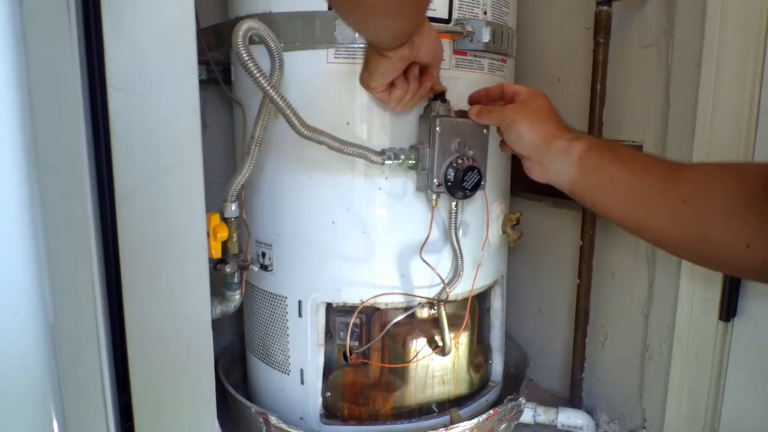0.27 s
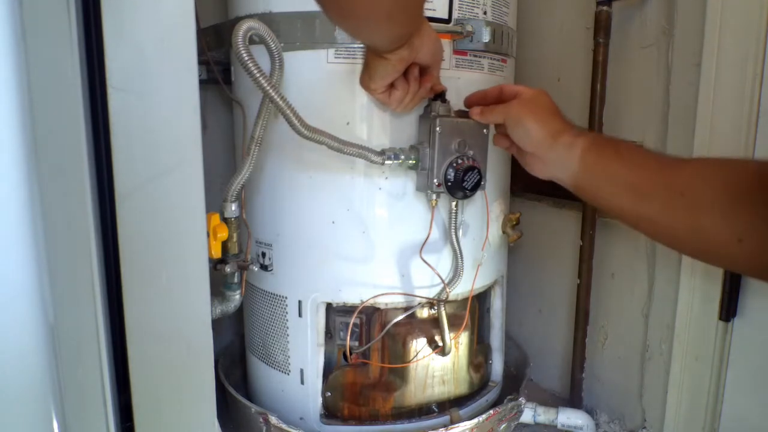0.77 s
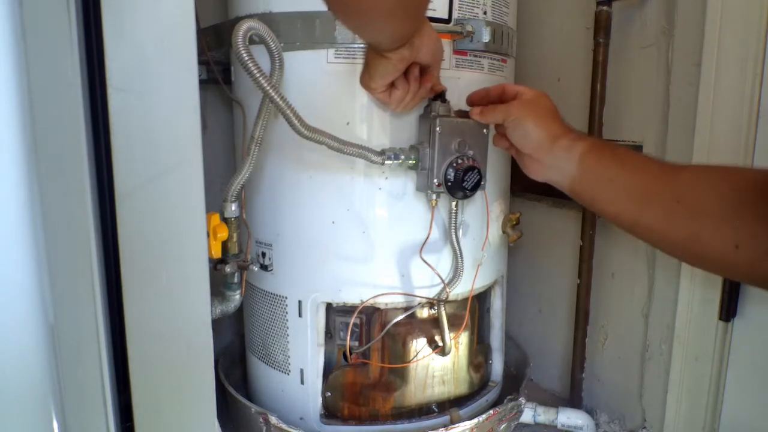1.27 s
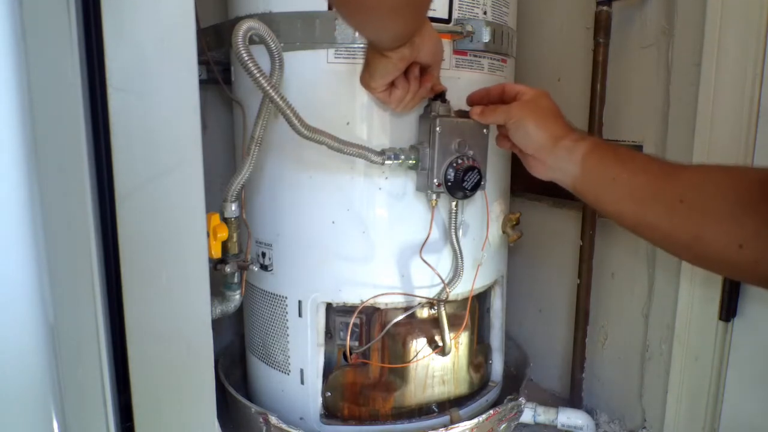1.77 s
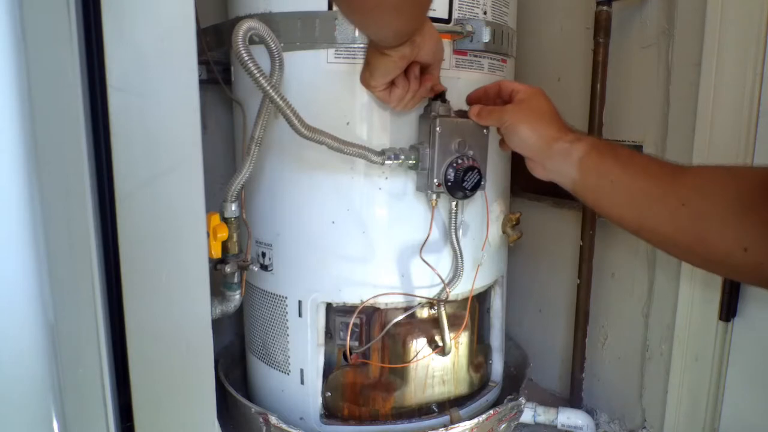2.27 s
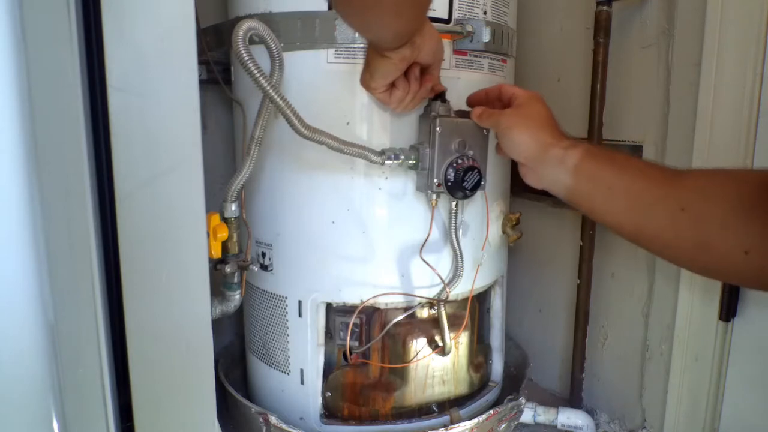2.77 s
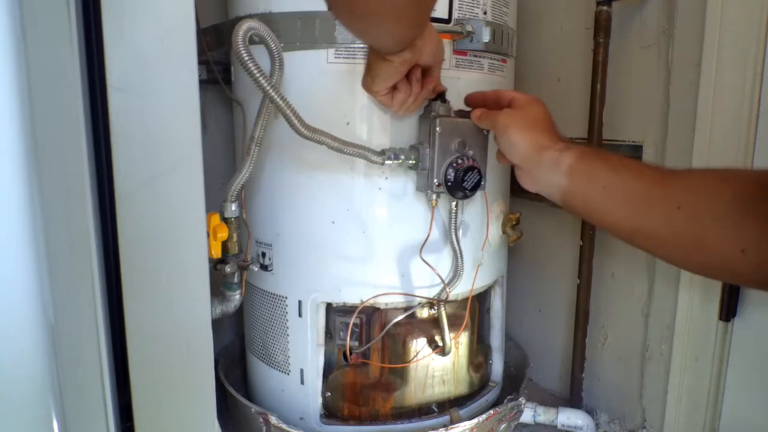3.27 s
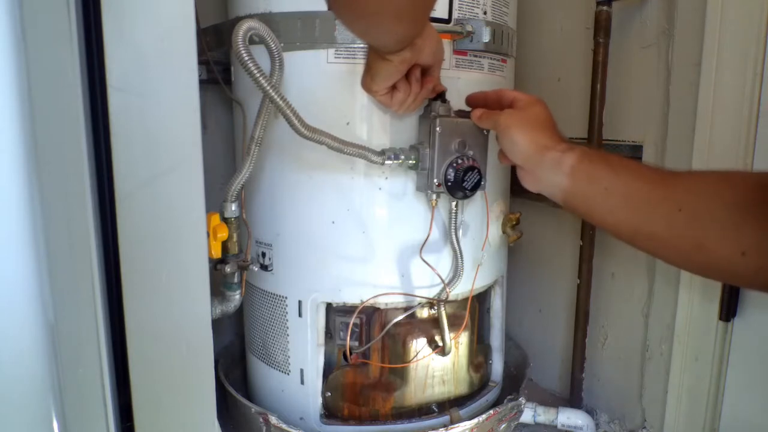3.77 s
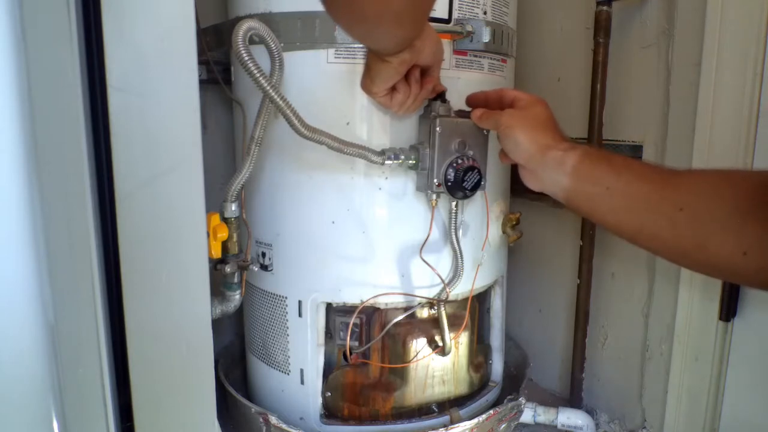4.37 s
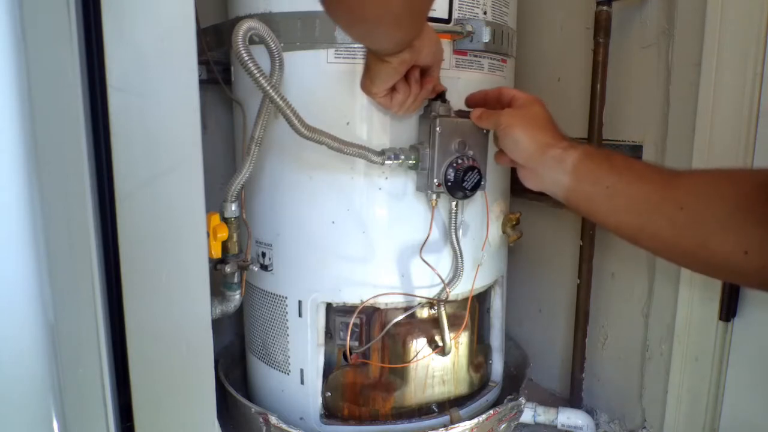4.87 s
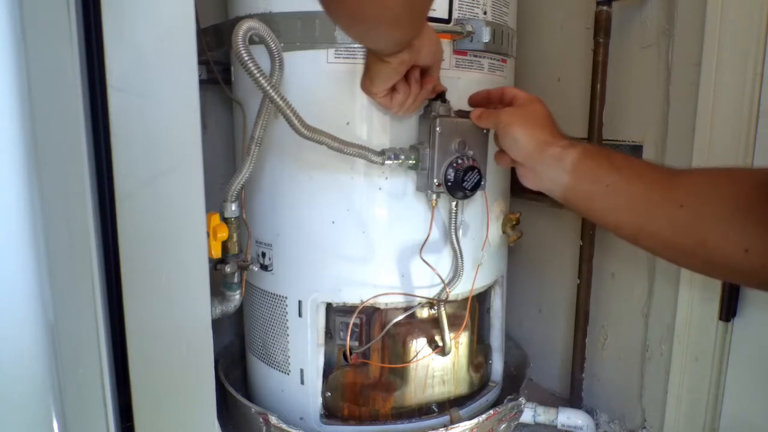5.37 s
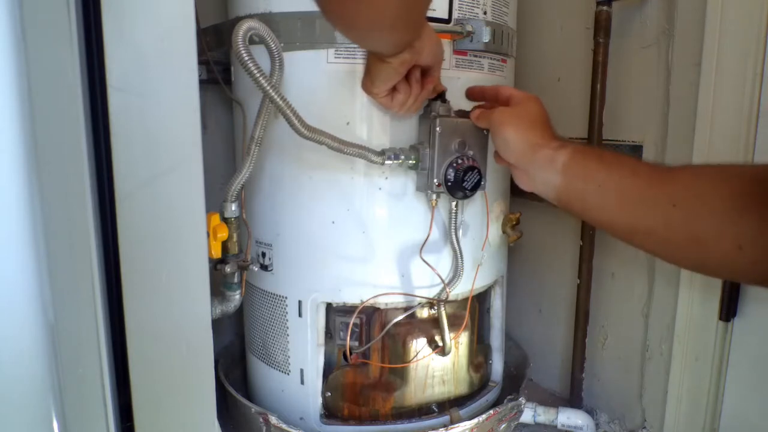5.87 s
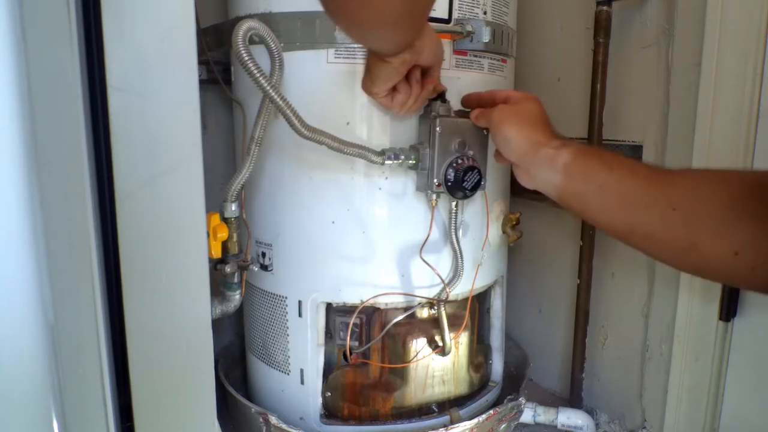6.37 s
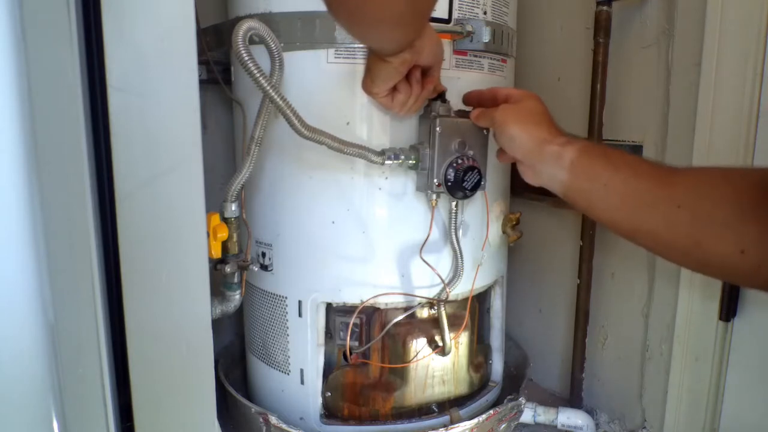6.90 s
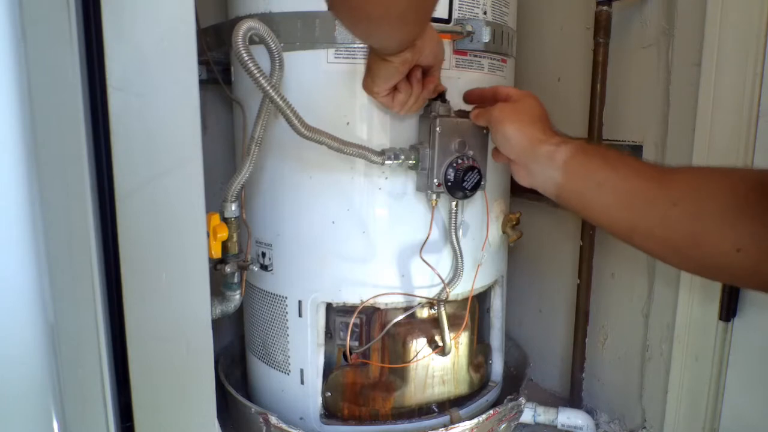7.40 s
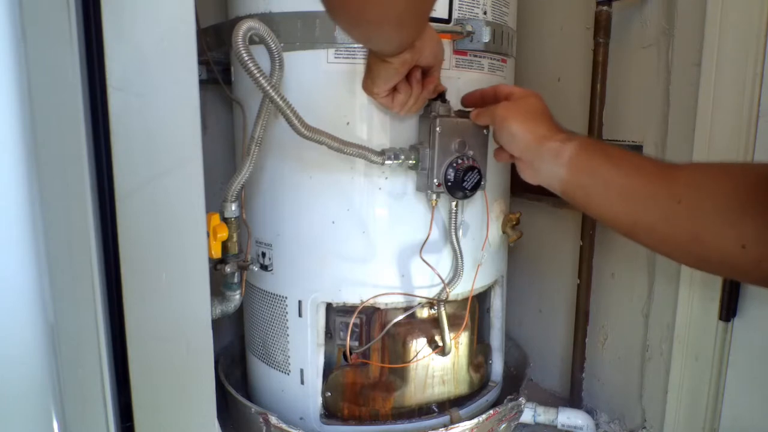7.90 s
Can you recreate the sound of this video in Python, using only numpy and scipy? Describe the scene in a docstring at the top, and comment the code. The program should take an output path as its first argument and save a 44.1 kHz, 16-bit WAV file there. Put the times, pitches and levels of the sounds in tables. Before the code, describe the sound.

Four sharp, ringing igniter clicks on a water heater alternate unevenly with softer clicks of the button springing back in a quiet closet.

```python
"""A quiet mono hum fills a narrow closet as the spark button of a water heater's gas valve springs back.
A thumb then pushes it four times: a spring hammer snaps onto the crystal and rings the sheet metal,
and letting go gives a softer click. After each blow the sound swells back and holds a moment before
it dies into the hum. Between the clicks and after the last, the thumb ticks faintly on the button."""
import sys
import numpy as np
from scipy import signal
from scipy.fft import rfft, irfft
from scipy.io import wavfile
from scipy.ndimage import uniform_filter1d

SR = 44100
rng = np.random.default_rng(int(sys.argv[2]) if len(sys.argv) > 2 else 0)


def master(y):
    """Save y as 16-bit WAV."""
    cut = np.clip(np.atleast_2d(y).T, -1, 1)
    pcm = np.round(cut * 32767)  # scale
    wavfile.write(sys.argv[1], SR, pcm.astype(np.int16))


N = 358974


def amp(db):
    return 10 ** (np.asarray(db) / 20)


def unit_rms(x):
    return x / np.sqrt(np.mean(x ** 2) + 1e-20)


def curve(hz, points):
    """Read (frequency, value) breakpoints along a log frequency axis."""
    freqs, values = np.transpose(points)
    return np.interp(np.log(hz + 1), np.log(freqs + 1), values)


def add(mix, start_s, sound):
    """Lay a sound into the mix, trimming any overhang."""
    at = round(start_s * SR)
    sound = sound[max(-at, 0):]
    part = mix[max(at, 0):][:len(sound)]
    part += sound[:len(part)]


# EQ of the room tone: f/Hz, relative level/dB
HUM_EQ = [(15, -20.5), (25, -2), (113, -3), (144, -2), (235, -6), (513, -7.5), (709, -1.5), (790, -3.5),
          (955, -3), (1030, -9), (1510, -13.5), (5660, -18.5), (13800, -18.5), (15800, -19.5)]

def hum(level_db=-62):
    """Room tone: steady noise that swells a little in patches, most in the bass."""
    frames, hz = N // 256 + 5, np.fft.rfftfreq(1024, 1 / SR)
    real, imag, patches = rng.standard_normal((frames, 513, 3)).T
    patches = uniform_filter1d(patches, size=10, axis=0)  # smooth across pitch
    patches = unit_rms(uniform_filter1d(patches, size=30, axis=1))  # and over time
    depth_db = curve(hz, [(600, 1.5), (2000, .5)])[:, None]
    spectrum = (real + 1j * imag) * amp(curve(hz, HUM_EQ)[:, None] + depth_db * patches)
    noise = signal.istft(spectrum, nperseg=1024, noverlap=768)[1][:N]
    return amp(level_db) * unit_rms(noise)


# Release cues, the first just before zero: t/s, echo gain/dB, ring gain/dB, swell length/s
RELEASES = [(-.03, -37.5, -46, 0.022), (2.034, -37.5, -44, 0.06), (4.723, -36.5, -43.5, 0.055),
            (7.02, -37.5, -43, 0.064), (7.942, -36.5, -39.5, 0.053)]
# Base EQ of a release: f/Hz, relative level/dB
RELEASE_EQ = [(53, -46), (90, -19), (151, -1), (344, -16), (590, -8.5), (687, -4), (834, 1), (1150, -6.5),
              (1230, -5), (1980, -5.5), (3260, -1.5), (5720, -12), (7570, -12), (15800, -53.5)]

def button_releases(mix, panel_db):
    """The button springs back: a soft click that lightly rings the metal."""
    for start_s, echo_db, ring_db, swell_s in RELEASES:
        noise = click_noise(RELEASE_EQ, panel_db, tilt_db_per_octave=0.5)
        echoes = closet_echoes(noise, swell_s, wait_s=0.0033, crack_db=10.5, crack_s=0.0029)
        ring = metal_ring(swell_s, bloom_s=0.034, damped_s=0.14)
        add(mix, start_s, amp(echo_db) * echoes + amp(ring_db) * ring)


def panel_response():
    """Countless small panel modes make a fine, jagged EQ, roughest in the treble: dB at every Hz."""
    hz = np.arange(SR // 2 + 1)
    ripple = uniform_filter1d(rng.standard_normal(len(hz)), size=20)
    ripple = unit_rms(uniform_filter1d(ripple, size=20))
    return ripple * curve(hz, [(1000, .6), (3000, 2.6)])


def click_noise(eq, panel_db, tilt_db_per_octave):
    """The raw body of a click: a second of grainy noise, coloured by its EQ and the panels."""
    hz = np.fft.rfftfreq(SR, 1 / SR)
    octave = np.log2(hz / 4000 + 1e-6)
    noise = rng.standard_normal(SR)
    grain = amp(0.64 * rng.standard_normal(SR // 40 + 1)).repeat(40)[:SR]
    colour_db = curve(hz, eq) + tilt_db_per_octave * octave + panel_db
    return unit_rms(irfft(rfft(noise * grain) * amp(colour_db)))


# Decay of the closet's early reflections: f/Hz, t60/s
EARLY_T60 = [(139, 0.2), (400, 0.094), (889, 0.28), (1500, 0.19), (2500, 0.12), (11000, 0.24)]
# How strongly each band follows the swell: f/Hz, factor on the swell rate
SWELL_SHARE = [(139, 0.704), (889, 1.16), (1500, .95), (3500, 1.87), (6500, 0.75)]

def closet_echoes(noise, swell_s, wait_s, crack_db, crack_s, base_swell_db_per_s=123.5, rise_cycles=6):
    """A short crack, dense reflections and a tail that swells briefly, shaped in half-octave bands."""
    t = np.arange(SR) / SR
    spectrum = rfft(noise)
    octave = np.log2(np.fft.rfftfreq(SR, 1 / SR) / 1000 + 1e-6)
    swell_db = base_swell_db_per_s * np.clip(np.minimum(t, swell_s) - wait_s, 0, 1)
    crack = amp(crack_db) * np.exp(-(t / crack_s) ** 2)
    echoes = np.zeros(SR)
    for band_octave in np.arange(-4, 5, .5):
        centre_hz = 1000 * 2 ** band_octave
        band = irfft(spectrum * np.clip(1 - 2 * abs(octave - band_octave), 0, 1))
        attack = 1 - np.exp(-t * centre_hz / rise_cycles)
        swell = amp(curve(centre_hz, SWELL_SHARE) * swell_db)
        early = amp(-60 * t / curve(centre_hz, EARLY_T60))
        tail_t60 = max(0.57 * 2 ** (-.45 * band_octave), 0.13)  # highs die sooner
        tail_db = max(-22.5 - 4.5 * band_octave, -32.5)  # and start quieter
        tail = amp(tail_db - 60 * t / tail_t60)
        echoes += band * attack * swell * (crack + early + tail)
    return echoes


# Modes of the sheet metal: f/Hz, relative level/dB, t60 after the swell/s
METAL_MODES = [(713, -13, .25), (821, -16, .5), (886, -11, .3), (956, -11, .4), (1160, -17, .42),
               (1324, -11, .15), (1435, -11, .33), (1548, -1, .62), (1696, -19, .3), (1766, -7, .42),
               (1954, -11, .58), (2024, -19, .6), (2320, -25, .55), (2600, -16, .15), (3758, -24, .27),
               (4116, -19, .33), (4194, -23, .2), (4471, -23, .28), (4756, -23, .3)]

def metal_ring(swell_s, bloom_s, damped_s):
    """The sheet metal blooms late. A soft blow wakes short modes less, as if they were damped_s older."""
    t = np.arange(SR) / SR
    age = (t - swell_s) * np.where(t < swell_s, .3, 1) + damped_s  # slow fade while the swell lasts
    ring = np.zeros(SR)
    for hz, level_db, t60 in METAL_MODES:
        lift, phase = rng.random(2)
        ring += amp(level_db + 1.1 * lift - 60 * age / t60) * np.sin(2 * np.pi * (hz * t + phase))
    return ring * (1 - np.exp(-(t / bloom_s) ** 2))


# Snap cues: t/s, echo gain/dB, ring gain/dB, swell length/s
SNAPS = [(0.6561, -18, -37.5, 0.13), (2.8698, -18.5, -37, 0.14), (5.621, -19, -36.5, 0.14),
         (7.4427, -18, -37.5, .18)]
# Base EQ of a snap: f/Hz, relative level/dB
SNAP_EQ = [(53, -61.5), (90, -33.5), (616, -10.5), (782, 0.5), (1180, -9.5), (1370, 3), (1740, 0.5),
           (2410, -9), (2800, -6.5), (6370, -2.5), (7100, 1), (11400, -27.5), (14500, -29), (15800, -40)]

def hammer_snaps(mix, panel_db):
    """The spring hammer hits the crystal: a bright knock layered with echoes and ringing metal."""
    for start_s, echo_db, ring_db, swell_s in SNAPS:
        noise = click_noise(SNAP_EQ, panel_db, tilt_db_per_octave=0.48)
        echoes = closet_echoes(noise, swell_s, wait_s=0.024, crack_db=-4.5, crack_s=0.002)
        ring = metal_ring(swell_s, bloom_s=0.07, damped_s=0)
        add(mix, start_s, amp(echo_db) * echoes + amp(ring_db) * ring)
        add(mix, start_s + .0012, amp(echo_db + 6) * igniter_knock())


# Short modes of the igniter body: f/Hz, bandwidth/Hz, relative level/dB
IGNITER_MODES = [(4600, 250, -6), (5960, 250, -1.5), (7060, 180, -2), (7470, 180, 0)]

def igniter_knock(contact_s=0.00052, typical_bounce_s=0.0026, bounce_db=-3):
    """The dry transient of a snap: the hammer strikes the igniter and bounces once."""
    t = np.arange(SR // 10) / SR
    ring = np.zeros(len(t))
    for hz, width_hz, level_db in IGNITER_MODES:
        detune = 1 + 0.017 * rng.standard_normal()
        ring += amp(level_db) * np.exp(-np.pi * width_hz * t) * np.sin(2 * np.pi * hz * detune * t)
    ring *= 1 - np.exp(-(t / contact_s) ** 2)  # the contact time rounds the attack
    delay = round(typical_bounce_s * SR * rng.uniform(0.57, 1.5))
    return ring + amp(bounce_db) * np.pad(ring, (delay, 0))[:len(t)]


# Thumb cues: t/s, level/dB, f/Hz
TICKS = [(1.74, -73, 1990), (2.748, -64, 2080), (4.494, -61, 2500), (5.838, -60, 5500), (6.822, -60, 2210),
         (8.109, -60.5, 7100)]

def thumb_ticks(mix, puff_t60=0.019, tail_t60=0.27):
    """The thumb ticks on the button: faint puffs of noise around one pitch, each with a short tail."""
    t = np.arange(4000) / SR
    envelope = amp(-60 * t / puff_t60) + amp(-4.5 - 60 * t / tail_t60)
    for start_s, level_db, hz in TICKS:
        bandpass = signal.butter(2, [hz / 2.0, hz * 1.33], "bandpass", fs=SR)
        puff = unit_rms(signal.lfilter(*bandpass, rng.standard_normal(len(t))))
        add(mix, start_s, amp(level_db) * puff * envelope)


def scene():
    """All clicks over the bed of hum, the same in both channels."""
    mix, panel_db = hum(), panel_response()
    hammer_snaps(mix, panel_db)
    button_releases(mix, panel_db)
    thumb_ticks(mix)
    return np.array([mix, mix])


def record(dry, cutoff_hz=15800):
    """A steep high cut takes the top air off the mix."""
    lowpass = signal.firwin(511, cutoff_hz, window=("kaiser", 9), fs=SR)
    return signal.oaconvolve(dry, lowpass[None], "same")


dry = scene()
out = record(dry)
master(out)
```